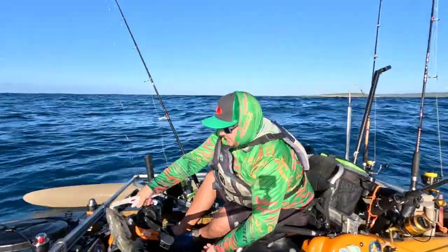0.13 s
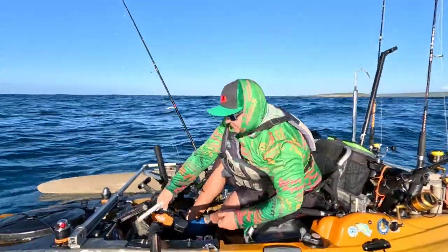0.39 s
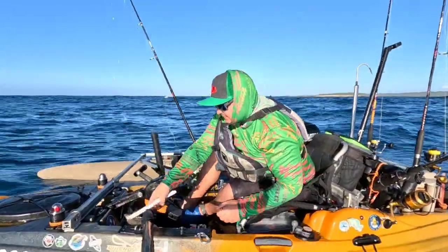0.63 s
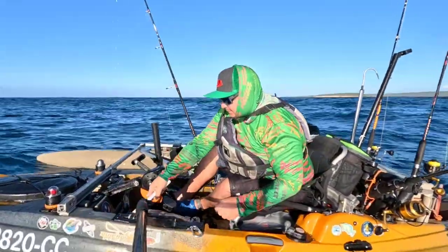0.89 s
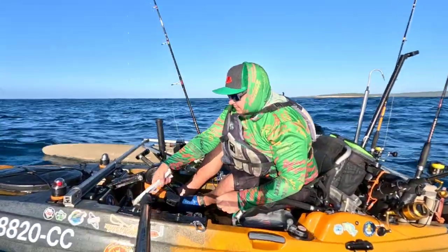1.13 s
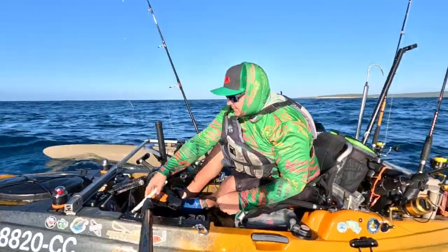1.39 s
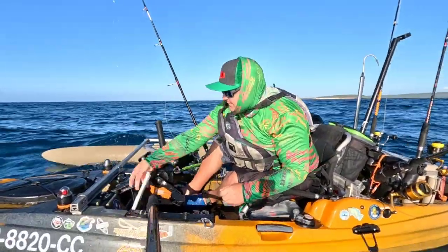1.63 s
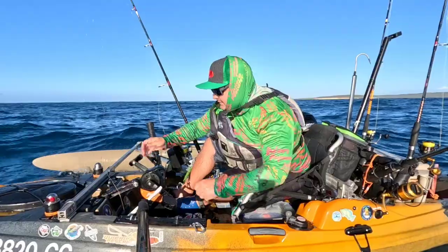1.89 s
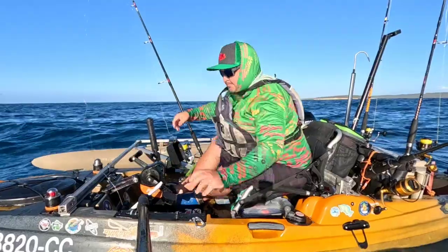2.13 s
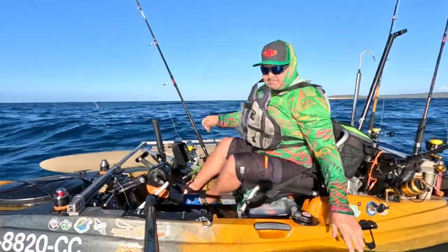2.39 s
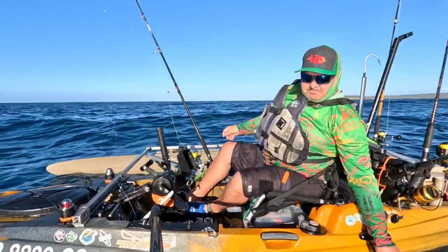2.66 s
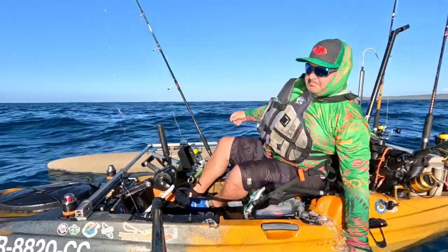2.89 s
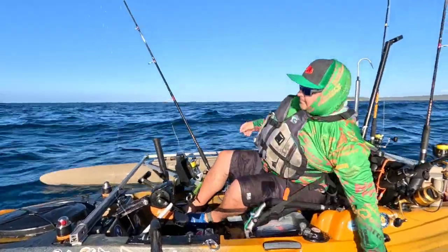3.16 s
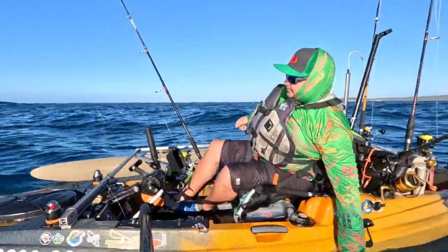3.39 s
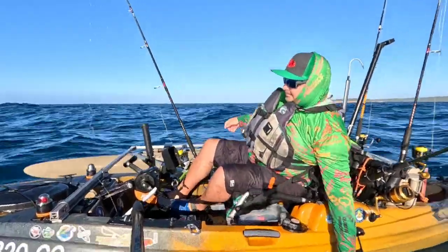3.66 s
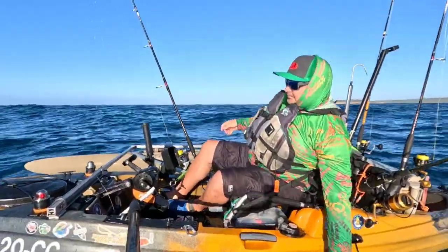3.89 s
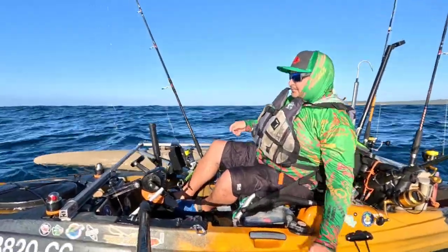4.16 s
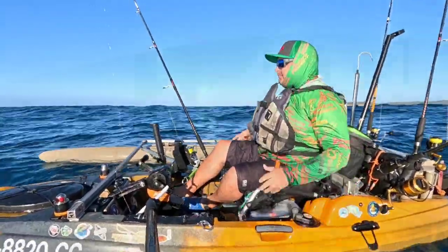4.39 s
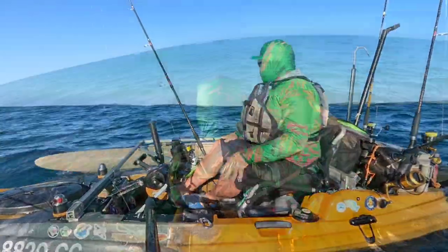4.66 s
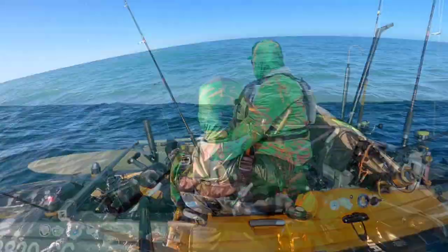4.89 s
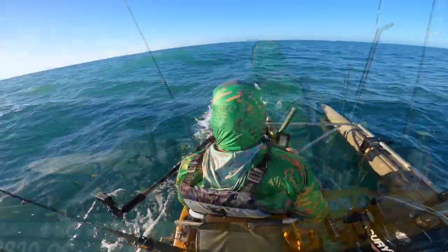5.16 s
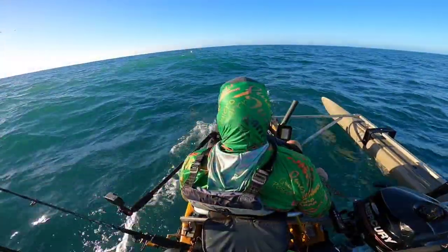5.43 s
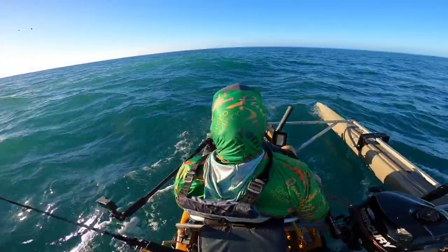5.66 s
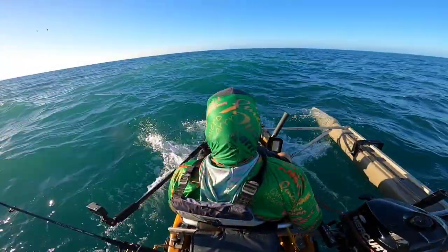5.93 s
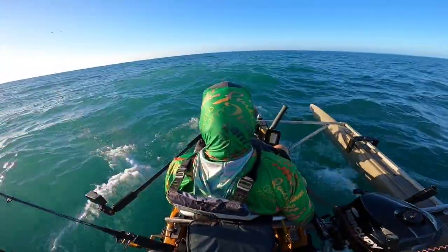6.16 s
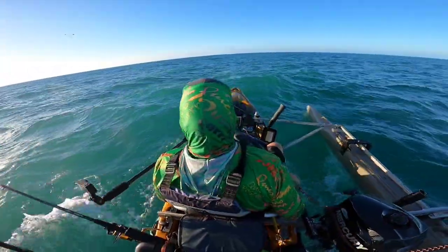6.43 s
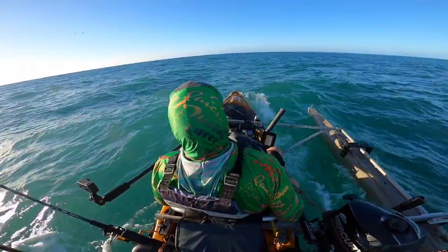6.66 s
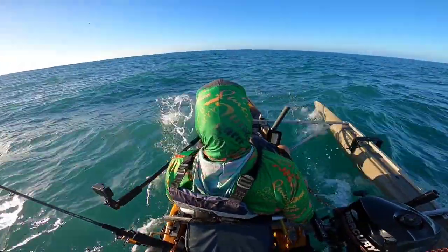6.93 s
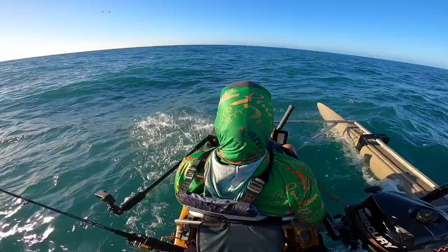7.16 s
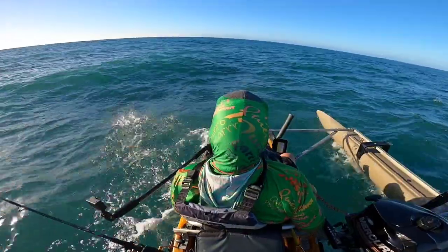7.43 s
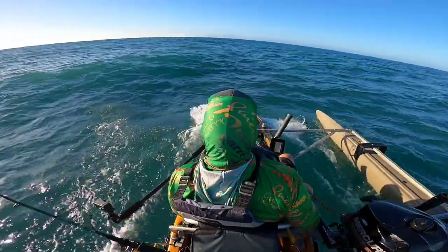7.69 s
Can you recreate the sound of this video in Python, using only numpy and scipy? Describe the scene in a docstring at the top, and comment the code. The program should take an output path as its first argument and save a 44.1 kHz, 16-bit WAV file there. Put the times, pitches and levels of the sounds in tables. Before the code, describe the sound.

Close onboard sound from a fishing kayak: uneven idle puffs and low water rumble behind hard hollow knocks, bright metallic clinks and wet rustling. Later come hand splashes, pitched drips and short rough rising blips. The sound cuts out for about a fifth of a second, then quickly returns as a fuller engine drone with fast cyclic rattle, continuous rushing water and occasional splash bursts and low blips. Open sea, no echo.

```python
"""A small boat's one-cylinder four-stroke outboard idles in soft puffs while gear knocks on the plastic hull,
tackle clinks, a hand splashes in the water and short rough tones blip; after a short silence the boat is
under way, its engine droning and its cowl rattling once a cycle as spray and wind rush along the hull.
Engine tones are sines locked to the engine cycle, water is filtered noise with damped-sine droplets,
and struck objects are decaying modes."""
import sys
import numpy as np
from scipy import signal
from scipy.fft import rfft, irfft, next_fast_len
from scipy.io import wavfile
from scipy.ndimage import uniform_filter1d, map_coordinates

SR = 44100
rng = np.random.default_rng(int(sys.argv[2]) if len(sys.argv) > 2 else 0)


def convert_level_to_amplitude(level_db):
    """Map a level in decibels to its linear amplitude factor."""
    exponent = np.asarray(level_db, float) / 20
    return 10 ** exponent


def store_pcm(level_fs):
    """Save levels as 16-bit WAV."""
    pcm = np.round(np.clip(level_fs, -1, 1) * 32767).astype(np.int16)
    wavfile.write(sys.argv[1], SR, np.atleast_2d(pcm).T)


N = 344112
T = np.arange(N) / SR


def unit(x):
    """Normalization: scales a signal to rms 1."""
    return x / np.sqrt(np.mean(x ** 2) + 1e-20)


def curves(rows):
    """Linear interpolation in time: one curve for each column after the time."""
    s, *columns = np.transpose(rows)
    return [np.interp(T, s, column) for column in columns]


def wobble(rate):
    """Band-limited fluctuation: a smooth curve through random knots, rate of them a second."""
    return map_coordinates(rng.standard_normal(int(N * rate / SR) + 4), [T * rate])


def filtered(x, response):
    """Linear filtering: the spectrum of x times a complex response of frequency."""
    m = next_fast_len(len(x) + 8192)
    return irfft(rfft(x, m) * response(np.fft.rfftfreq(m, 1 / SR)), m)[:len(x)]


def coloured(x, spectrum):
    """Spectral shaping by (hz, db) points on a log frequency axis, then rms 1."""
    f, db = np.transpose(spectrum)
    return unit(filtered(x, lambda hz: convert_level_to_amplitude(np.interp(np.log(hz + 1), np.log(f + 1), db))))


def resonance(f, hz, width):
    """Damped oscillator: the causal response of one mode, 1 at its peak."""
    return 1j * f * width / (hz * hz - f * f + 1j * f * width)


def droplets(per_s, hz, turns, spread_db):
    """Bubble oscillation: a random patter of tiny bubbles, each a few cycles of a damped sine."""
    when, pitch, size = rng.random((3, int(per_s * N / SR)))
    f = np.clip(hz * 4.5 ** (2 * pitch - 1), 600, 15000)[:, None]
    t = np.arange(300) / SR
    strength = convert_level_to_amplitude(-spread_db * np.log(size + .01))[:, None]
    grains = strength * np.sin(2 * np.pi * f * t) * f * t * np.exp(-2 * f * t / turns)
    where = (when[:, None] * N).astype(int) + np.arange(300)
    return unit(np.bincount(where.ravel(), (grains * np.sqrt(f)).ravel(), N + 300)[:N])


def rush(patchy_db, fizz, per_s):
    """Turbulence: white noise with time-frequency patches of random gain, plus droplets."""
    z = signal.stft(rng.standard_normal(N), nperseg=512)[2]
    field = uniform_filter1d(uniform_filter1d(rng.standard_normal(z.shape), 6, 0), 10, 1)
    noise = signal.istft(z * convert_level_to_amplitude(patchy_db * unit(field)), nperseg=512)[1][:N]
    return unit(noise) + fizz * droplets(per_s, 2387, turns=5.1, spread_db=4.0)


def stroke(cycles, at, width, scatter_db):
    """Cyclic modulation: a gate that swells once an engine cycle, at a new strength each time."""
    turn = cycles - at + .5
    size = convert_level_to_amplitude(scatter_db * rng.standard_normal(600))[turn.astype(int)]
    return size * np.exp(-.5 * ((turn % 1 - .5) / width) ** 2)


def cowl(gate, blows, fast):
    """Modal response: valve clatter, intake noise and firing blows ring a cover that muffles the treble."""
    # modes of the engine cover: mode_hz, width_hz, idle_db, cruise_db
    cover_modes = [(522.6, 32, -15.5, -6), (647.3, 13.7, 6, 5.5), (753, 22, -7, 9.5), (1050, 124, 2.5, 9.5),
                   (1106, 61, 1.5, 11), (1149, 32, 1, -35), (1304, 31, -6, 0), (1344, 14.7, -15, 4),
                   (1432, 84, -19, 5.5), (1848, 34, -11.5, -9), (2050, 44, -5.5, -31), (2670, 24, -11.5, 3),
                   (3320, 880, -10.5, -24)]

    def response(f):
        total = 0
        for k, (hz, width, *mode_db) in enumerate(cover_modes):
            total = total + (-1) ** k * convert_level_to_amplitude(mode_db[fast]) * resonance(f, hz, width)
        return total / (1 + 1j * f / 4000) ** 3

    return unit(filtered(unit(gate * rng.standard_normal(N)) + blows, response))


def exhaust_puffs(cycles, leg_hz):
    """Pulsed pipe resonance: each firing sends a short, slightly rising, breathy puff down the leg."""
    glide = 1 + .16 * (cycles % 1 - .5) + .025 * wobble(30)
    phase = 2 * np.pi * np.cumsum(leg_hz * glide) / SR
    breath = np.cos(phase) * (1 + .25 * wobble(60)) + .25 * np.sin(phase) * wobble(60)
    return unit(breath * (0.11 + stroke(cycles, 0.6, 0.24, scatter_db=-2.0) ** 0.9))


def idling():
    """Amplitude modulation: swells that cover and bare the exhaust leg vary the engine's puffs and rattle."""
    # engine cycles completed: time_s, cycles
    idle_cycles = [(0.0, 0.75), (0.3, 4.63), (0.6, 8.75), (0.9, 12.71), (1.2, 16.66), (1.5, 20.43),
                   (1.8, 24.15), (2.1, 27.8), (2.4, 31.66), (2.7, 35.48), (3.0, 39.22), (3.3, 42.94),
                   (3.6, 46.7), (3.9, 50.72), (4.2, 54.46), (4.5, 58.06), (4.8, 61.79), (4.92, 63.3)]
    # the leg in the swell, before the faster wobbles: time_s, exhaust_pitch_hz, exhaust_db, cowl_rattle_db
    leg = [(0.0, 226.6, -46, -45), (0.16, 217.8, -52, -44), (0.22, 215.5, -32.5, -45),
           (0.31, 220, -37, -43), (0.37, 204.3, -38, -42.5), (0.6, 263.8, -33, -45), (0.81, 240, -27, -43),
           (1.06, 227, -29, -42), (1.15, 214.8, -35, -43.5), (1.85, 213.3, -45.5, -45),
           (1.94, 220.5, -28.5, -39), (2.08, 232.5, -27, -42), (2.57, 223.6, -38, -49),
           (2.8, 214.7, -53, -47), (3.12, 220.7, -39.5, -45.5), (3.27, 241.5, -30, -49),
           (3.34, 230, -45, -45), (3.43, 243.3, -31.5, -45), (3.54, 224.5, -41.5, -49),
           (3.73, 219.6, -30.5, -56), (3.9, 231.9, -43.5, -40), (4.04, 246.1, -31, -48),
           (4.2, 226.4, -49, -45.5), (4.31, 198.8, -31.5, -49), (4.4, 212, -46, -46.5),
           (4.55, 222, -45, -47), (4.94, 228.5, -36.5, -48)]
    cycles, = curves(idle_cycles)
    leg_hz, leg_db, rattle_db = curves(leg)
    puffs = exhaust_puffs(cycles, leg_hz)
    gate = 0.25 + stroke(cycles, 0.38, 0.14, scatter_db=-2.5)
    gate = gate + 0.6 * stroke(cycles, 0.898, 0.034, scatter_db=2.5)
    rattle = cowl(gate, 0, fast=False)
    gurgle_db = 2.5 * wobble(11)  # puff-to-puff unevenness of the drowned exhaust
    return convert_level_to_amplitude(leg_db + gurgle_db) * puffs + convert_level_to_amplitude(rattle_db + 0.72 * wobble(11.0)) * rattle


def lapping():
    """Filtered turbulence: a low rumble under the hull and a steadier lap of water above it."""
    # rumble under the hull, before its wobble: time_s, level_db
    rumble_level = [(0, -36), (0.4, -33.5), (0.75, -35), (1.4, -35), (2.0, -34), (2.6, -33), (3.0, -34.5),
                    (3.7, -34), (4.2, -35), (4.92, -32.5)]
    # background spectrum, used above 300 Hz: frequency_hz, relative_db
    lap_spectrum = [(13, -31), (22, -1), (257, -6), (366, -38.5), (420, -10), (522, -12.5), (877, -18.5),
                    (1060, -21), (1250, -24), (1740, -25), (2160, -26), (4160, -36), (9000, -55),
                    (15000, -93.5)]
    rumble = coloured(rng.standard_normal(N), [(10, -20.5), (30, -1.0), (60, -2.5), (120, -5.5), (150, -5.0),
                                               (200, 0.0), (400, -15.0), (600, -61.5)])
    lap_points = [(250, -88)] + [p for p in lap_spectrum if p[0] > 300]
    lap = coloured(rush(patchy_db=4.0, fizz=0.17, per_s=200), lap_points)
    rumble_db, = curves(rumble_level)
    return convert_level_to_amplitude(rumble_db + 2.2 * wobble(26)) * rumble + convert_level_to_amplitude(-47.5 + 1.6 * wobble(4.86)) * lap


def knocks():
    """Impact excitation: each contact is a ring, a noisy crack, a tick, a hiss and a thump of the hull."""
    # gear and water on the hull: start_s, level_db, ring_hz, thump_db (re level_db)
    contacts = [(0.037, -44, 1210, 7), (0.196, -45, 706, 9), (0.225, -39, 2100, 18),
                (0.343, -28, 607, -0.5), (0.352, -38, 497, 20), (0.363, -17.5, 990, -3),
                (.367, -22.5, 980, -9), (0.374, -36, 700, 15), (0.412, -31, 897, 8),
                (0.459, -16.5, 980, -6), (0.518, -29, 857, -7), (0.558, -37, 988, -7),
                (0.866, -32, 1212, 9.5), (1.333, -21.5, 1250, -4), (1.533, -21.5, 880, -17),
                (1.568, -25, 750, -9.5), (1.947, -24.5, 1056, 3), (1.958, -18, 1140, -6.5),
                (2.285, -31.5, 689.8, 2.5), (2.426, -32.5, 800, -11), (2.531, -31, 660, 9.5),
                (3.165, -22, 1360, -19), (3.173, -22, 1100, -14), (3.191, -24, 820, -16),
                (3.242, -32, 656, -20), (3.281, -24.5, 1000, -22), (3.288, -21, 820, -13),
                (3.2958, -24, 855, -15), (3.452, -35, 1190, -13), (3.401, -37.5, 506, 9.5),
                (3.482, -26, 653, 0.5), (3.556, -35, 910, -5), (3.608, -32.5, 606, 9),
                (3.737, -32, 1703, -8), (3.745, -25.5, 1130, 4.5), (3.846, -27.5, 710, -3),
                (3.854, -24.5, 840, -20), (3.865, -25, 794, -5), (3.885, -27, 790, -18),
                (4.009, -31.5, 1208, -6), (4.102, -28, 1590, -5), (4.696, -32, 1050, -8),
                (4.829, -28.5, 659, 1)]
    hull_hz, hull_t60, hull_share = 166, 0.15, 0.9  # lowest hull mode, its decay in s, its part of the thump
    out, t = np.zeros(N + SR), np.arange(SR // 5) / SR

    def dying(t60):
        return convert_level_to_amplitude(-60 * t / t60) * (1 - np.exp(-t / .0006))

    for s, db, hz, thump_db in contacts:
        a, b, c = rng.standard_normal((3, len(t)))
        t60 = 0.031 * (1000 / hz) ** 0.19  # shorter for higher rings
        ring = 1.09 * np.sin(2 * np.pi * hz * t) * dying(0.87 * t60)
        crack = unit(filtered(a, lambda f: resonance(f, hz, 1.3 * hz) * resonance(f, hz, 4 * hz)))
        crack = .5 * crack * dying(1.4 * t60)
        hiss = convert_level_to_amplitude(-29.5) * unit(filtered(b, lambda f: resonance(f, 4500, 5000) ** 3)) * dying(t60)
        thud = unit(filtered(c, lambda f: resonance(f, 261, 202) ** 2)) * dying(0.1)
        hull = hull_share * np.sin(2 * np.pi * hull_hz * t) * dying(hull_t60)
        tick = 0.3 * b * dying(.006)
        out[round(s * SR):][:len(t)] += convert_level_to_amplitude(db) * (ring + crack + hiss + convert_level_to_amplitude(thump_db) * (thud + hull) + tick)
    return filtered(out[:N], lambda f: 1 / (1 + 1j * f / 6000) ** 2)  # the knocks' treble rolls off above 6 kHz


def stirring():
    """Splash noise: wet rustle in uneven spurts whose brightness tips the balance of lows and highs."""
    # rustle spectrum: frequency_hz, relative_db
    rustle = [(210, -34.5), (350, 3), (783, -7.5), (1260, -6.5), (1380, -10), (3350, -14.5), (7720, -27),
              (12800, -45), (15200, -50)]
    # spurts, a quick swell and a slower fade: peak_s, level_db, fade_s (for 20 dB), brightness_db
    spurts = [(0.041, -40, 0.032, 11.5), (0.232, -48, 0.093, -5), (0.35, -38.5, 0.14, 8.5),
              (0.37, -56, 0.043, -9.5), (0.413, -31.5, 0.039, 0.5), (0.439, -44, 0.046, 1),
              (0.467, -31, 0.1, 2.5), (.483, -38, 0.084, -0.5), (0.56, -38, 0.099, 2),
              (0.63, -37.5, 0.037, 1), (0.809, -41.5, 0.025, -2), (0.897, -37, 0.068, 4.5),
              (1.0, -48, 0.088, 2), (1.065, -56, 0.065, 12), (1.335, -37, 0.046, 1), (1.56, -44, 0.2, 2),
              (1.77, -38.5, 0.097, 0.5), (1.829, -34.5, .04, 10), (1.865, -41.5, 0.089, -2.5),
              (1.971, -37.5, 0.12, -1), (2.079, -42, 0.23, -0.5), (2.4, -48.5, 0.85, 1.5),
              (2.951, -38, 0.062, 1.5), (3.0, -38.5, 0.15, 4.5), (3.12, -40.5, 0.25, 6.5),
              (3.173, -25, 0.051, 0.5), (3.2, -32.5, 0.11, 2.5), (3.243, -30, 0.15, 3),
              (3.29, -39.5, 0.16, 3.5), (3.42, -40, 0.15, 1.5), (3.552, -38.5, 0.13, 0.5),
              (3.578, -34, 0.089, -0.5), (3.604, -36, 0.044, -1), (3.67, -41.5, .12, -1.5),
              (3.743, -35, 0.11, -1), (3.852, -36, 0.096, -1.5), (3.886, -32.5, 0.13, 3.5),
              (4.019, -41, 0.14, 3.5), (4.106, -33.5, 0.056, 0), (4.181, -41.5, 0.23, 1.5),
              (4.33, -45, 0.13, 3.5), (4.828, -42, 0.57, 3.5), (5.83, -23, 0.051, 1.5),
              (6.342, -23.5, 0.093, -0.5), (7.18, -26, 0.12, 4.5), (7.48, -31, .04, 7.5)]
    swell_over_fade = .4
    trickle_db = -60  # steady trickle between spurts
    wet = coloured(rush(patchy_db=1.2, fizz=0.8, per_s=2200) * convert_level_to_amplitude(2 * wobble(90)), rustle)
    spatter = coloured(droplets(500, 3000, turns=0.68, spread_db=4.5),
                       [(500, -23.0), (1500, -4.5), (5000, -9.5), (9000, -39.0), (12000, -33), (15000, -56)])
    wet = wet + convert_level_to_amplitude(-10) * spatter
    low = filtered(wet, lambda f: 1 / (1 + (f / 2500) ** 4))
    high = filtered(wet, lambda f: 1 / (1 + (6000 / (f + 1)) ** 4))
    middle = wet - low - high
    power, tipped = np.full(N, convert_level_to_amplitude(2 * trickle_db)), np.zeros(N)
    for s, db, fade, bright_db in spurts:
        near = slice(max(round((s - .5) * SR), 0), round((s + 1) * SR))
        late = (T[near] - s) / max(fade, .01)
        spurt = convert_level_to_amplitude(2 * db - 40 * np.where(late > 0, late, -late / swell_over_fade))  # power
        power[near] += spurt
        tipped[near] += spurt * np.clip(bright_db, -8, 14)
    tilt_db = tipped / power  # power-weighted mean brightness
    return np.sqrt(power) * (convert_level_to_amplitude(-2 * tilt_db) * low + middle + convert_level_to_amplitude(tilt_db) * high)


def drips():
    """Bubble entrainment: each drip is a rising damped plip with a breath of noise at its own pitch."""
    # pitched drips, spatter and small ticks: start_s, level_db, pitch_hz (at the start)
    plips = [(0.2283, -23.5, 2150), (0.4575, -24.5, 4530), (.625, -53, 7520), (0.7116, -46, 3680),
             (0.997, -37, 3100), (1.5327, -35, 2010), (1.6066, -25.5, 2030), (1.8253, -29, 3740),
             (1.9587, -21, 2540), (1.9595, -21, 3500), (2.4054, -40.5, 3720), (2.937, -48, 7880),
             (2.959, -38, 6830), (3.028, -42.5, 6540), (3.085, -23, 1750), (3.0982, -26, 2177),
             (3.1198, -29.5, 3500), (3.121, -31, 2300), (3.2415, -27.5, 2000), (3.2425, -29, 3400),
             (3.3328, -35, 2814), (3.375, -33.5, 2700), (3.429, -35.5, 2336), (3.4394, -48.5, 7710),
             (3.5063, -45, 2087), (3.56, -40, 5450), (3.6447, -44, 4900), (3.696, -43, 3560),
             (3.747, -33, 2000), (3.885, -25.5, 2340), (4.006, -40, 5880), (4.1025, -20, 1730),
             (4.103, -25, 2507), (4.115, -30.5, 3200), (4.1624, -35, 1987), (4.1904, -41, 7420),
             (4.2537, -44.5, 3900), (4.3215, -32, 3465), (4.3338, -31.5, 2500), (4.36, -39, 2660),
             (4.809, -34.5, 4500), (4.828, -36, 5500)]
    t60, half_rise_hz = 0.024, 230  # decay in s; half the pitch rise over that time
    out, t = np.zeros(N + SR), np.arange(SR // 16) / SR
    for s, db, hz in plips:
        plip = np.sin(2 * np.pi * t * (hz + half_rise_hz * t / t60))
        noise = rng.standard_normal(len(t))
        spit = 0.82 * unit(filtered(noise, lambda f: resonance(f, hz, 0.34 * hz) ** 2))
        envelope = convert_level_to_amplitude(db - 60 * t / t60) * (1 - np.exp(-t / 0.00042))
        out[round(s * SR):][:len(t)] += envelope * (.6 * plip + spit)
    return out[:N]


def clinks():
    """Modal synthesis: each clink rings the tackle's modes anew, unevenly, roughened by scraping."""
    # modes of small metal tackle: mode_hz, mode_db, t60_s
    tackle = [(3100, -5, 0.065), (3300, -6.5, .06), (3900, -11, .07), (4550, -2, .065), (5090, -4.5, 0.1),
              (5470, -6, .05), (6150, -12, .04), (7640, -9, .065), (8460, -16, .045), (9100, -17.5, .04),
              (10700, -18.5, 0.032), (11800, -18, .03), (13100, -26.5, .03)]
    # clinks: start_s, level_db, tilt_db_per_octave
    strikes = [(.413, -45, -2.5), (0.4593, -36.5, -5), (.47, -52, 4), (.872, -58, -2), (.892, -38.5, 0),
               (.911, -44, 9), (.9403, -50.5, -5), (.95, -55, -10), (.9742, -48.5, -2), (.993, -45, -10.5),
               (1.003, -42.5, -3), (1.025, -55.5, 3), (1.1264, -62, -2), (1.1817, -63.5, -4),
               (1.4586, -54, 6), (1.73, -57, 10), (1.7619, -40, 2), (1.826, -35.5, 4.5), (1.863, -46, 8),
               (1.9435, -50, 0.5), (1.959, -41, 1.5), (1.972, -35.5, -6), (2.0149, -56, -4.5)]
    out, t = np.zeros(N), np.arange(SR // 8) / SR
    hz, mode_db, t60 = np.transpose(tackle)[:, :, None]
    for s, db, tilt_db in strikes:
        luck, detune = rng.standard_normal((2, len(tackle), 1))
        level = convert_level_to_amplitude(mode_db + 3.5 * luck + tilt_db * np.log2(hz / 5000) - 60 * t / t60)
        grit = rng.standard_normal((len(tackle), len(t)))
        scrape = .6 + 3.5 * uniform_filter1d(grit, 40, 1)
        scrape = scrape + 1.3 * uniform_filter1d(grit, 7, 1) * convert_level_to_amplitude(-60 * t / .05)
        ringing = (level * scrape * np.sin(2 * np.pi * hz * (1 + 0.015 * detune) * t)).sum(0)
        out[round(s * SR):][:len(t)] += convert_level_to_amplitude(db) * ringing * (1 - np.exp(-t / 0.0014))
    return out


def whiffs():
    """Friction noise: crackly swells of very high hiss, like line or wet cloth sliding."""
    # whiffs with a Gaussian swell: peak_s, level_db, half_length_s
    slides = [(1.005, -68, .02), (1.07, -69, 0.014), (1.326, -69, 0.011), (1.46, -70.5, 0.011),
              (1.56, -75, 0.031), (1.82, -59, 0.012)]
    swell = sum(convert_level_to_amplitude(db) * np.exp(-.5 * ((T - s) / half) ** 2) for s, db, half in slides)
    hiss = coloured(rng.standard_normal(N), [(6000, -30), (10500, -3.5), (12500, 1.5), (14000, -12), (15300, -28)])
    return swell * unit(convert_level_to_amplitude(4 * wobble(150)) * hiss)


def short_tones():
    """Frequency modulation: short rough tones, mostly rising, with a wavering phase and level."""
    # tones, before the roughness: start_s, level_db, start_hz, length_s, end_over_start_pitch
    blips = [(2.433, -25, 292, 0.008, 1.3), (2.642, -33.5, 297, 0.06, 1.74), (2.717, -33, 306, 0.037, 1.7),
             (3.535, -38, 1960, 0.031, 0.53), (3.576, -31, 407, 0.033, 1.8), (3.663, -35, 665, 0.024, 1.3),
             (3.67, -29.5, 265, 0.065, 1.37), (3.695, -35, 1030, .012, 1.1), (3.765, -32, 1073, .012, 1.2),
             (3.841, -28, 449, 0.01, 1.44), (3.859, -28.5, 774, 0.032, 1.1), (3.866, -30, 1265, .016, 1.5),
             (6.291, -26, 413, 0.04, 1.47), (6.327, -27, 363, 0.051, 1.9), (6.756, -24, 296, 0.045, 1.7),
             (7.143, -25, 387, 0.033, 1.44), (7.328, -24.5, 381, 0.048, 1.5),
             (7.687, -21.5, 312, 0.027, 1.4)]
    out, rough_db, waver = np.zeros(N), 4 * wobble(200), .55 * wobble(180)
    for s, db, start_hz, length, rise in blips:
        u = np.linspace(0, 1, round(length * SR))
        span = slice(round(s * SR), round(s * SR) + len(u))
        phase = 2 * np.pi * np.cumsum(start_hz * (1 + (rise - 1) * u ** 1.91)) / SR
        tone = np.sin(np.pi * u ** 0.88) * np.sin(phase + waver[span])
        out[span] += convert_level_to_amplitude(db + rough_db[span]) * tone
    return out


def cruise_cycles():
    """Phase accumulation: a steady pace plus the hunting of the engine as the boat climbs and drops."""
    # time_s, cycles_ahead of the steady pace
    hunt = [(5.3, -.07), (5.6, -.015), (5.9, .03), (6.05, .035), (6.2, .01), (6.4, -.01), (6.65, .015),
            (6.95, -.02), (7.25, -.065), (7.55, -.08), (7.8, -.1)]
    steady = 1.46 + 28.86 * np.maximum(T - 5.1, 0)  # 28.86 cycles a second
    return steady + curves(hunt)[0] + 0.0025 * wobble(8)


def order_line(cycles, k, lag, slack):
    """Harmonic order: an unsteady line at k times the cycle rate; lag and slack in turns of the line."""
    # the orders meet in one sharp suction dip a cycle, and drift a little around it
    return -np.cos(2 * np.pi * (k * (cycles + 0.033) - lag + slack * wobble(4.6))) * np.sqrt(2)


def running_exhaust(cycles, leg_hz):
    """Source and filter: engine orders under the wandering resonance of the half-drowned exhaust leg."""
    # exhaust orders before the resonance: cycle_rate_multiple, relative_db
    orders = [(1, -15), (3, -9), (4, -2), (5, -3.5), (6, -6.5), (7, -5), (8, -5), (9, -2), (10, -2.5),
              (11, -18.5), (12, -18.5), (13, -15)]
    rate_hz = np.gradient(cycles) * SR
    drift = [(0, .04), (.15, .075)]  # (lag, slack) of even and odd orders; the odd ones come late
    total = 0
    for k, db in orders:
        strength = convert_level_to_amplitude(db + 1.9 * wobble(4) + 1.2 * wobble(16))
        leg_gain = 1 + 4 / (1 + ((k * rate_hz - leg_hz) / 20) ** 2)
        total = total + strength * leg_gain * order_line(cycles, k, *drift[int(k) % 2])
    return unit(total)


def running_rattle(cycles, clatter):
    """Periodic impacts: firings and valve gear that clatters alike each cycle shake the cowl."""
    firings = unit(np.diff(np.floor(cycles + .05), prepend=1) * convert_level_to_amplitude(1.3 * rng.standard_normal(N)))
    gear = unit(clatter * rng.standard_normal(1500)[(cycles % 1 * 1500).astype(int)])
    return cowl(clatter, -3.3 * firings + 1.7 * gear, fast=True)


def block_clatter(cycles, beat):
    """Cyclostationary noise: the block's clatter repeats each cycle, and its pattern slowly changes."""
    # clatter spectrum: frequency_hz, relative_db
    block_spectrum = [(350, -40), (550, -3), (700, -1), (870, -5), (1070, 2), (1220, -5), (1400, -3),
                      (2000, -7), (2550, -9), (2680, -2), (2800, -10), (3300, -9), (5000, -15), (8000, -26),
                      (12000, -60)]
    patterns = rng.standard_normal((3, 1500))[:, (cycles % 1 * 1500).astype(int)]
    pattern = patterns[0] + .7 * wobble(3) * patterns[1] + .7 * wobble(3) * patterns[2]
    return coloured(beat * pattern, block_spectrum)


def hull_rush(beat, wash_db):
    """Modulated turbulence: wash and spray along the hull, with a faint hiss in the top treble."""
    # low end of the wash, and the rest of it: frequency_hz, relative_db
    buffet = [(13, -33), (22, -6.5), (53, -7), (103, -4), (199, -3.5), (300, -8)]
    wash_spectrum = [(421, -11), (1070, -20.5), (1200, -21), (2710, -27.5), (5000, -36), (6500, -46),
                     (11000, -120)]
    # spray spectrum: frequency_hz, relative_db
    spray_spectrum = [(1760, 1), (3000, 1.5), (3830, -0.5), (4160, -5.5), (6650, -17.5), (8490, -12),
                      (11400, -25), (13800, -32), (15200, -53)]
    # treble, before the spray's wobble: time_s, spray_db (re wash_db), top_hiss_db
    bright = [(5.2, -17, -110), (5.4, -9, -66), (5.9, -7.5, -59.5), (7.3, -8, -59), (7.8, -7, -58)]
    spray_db, top_hiss_db = curves(bright)
    wash = coloured(rush(patchy_db=0.8, fizz=0.24, per_s=900) * beat, buffet + wash_spectrum)
    spray = coloured(rush(patchy_db=1.2, fizz=.4, per_s=2500) * beat, spray_spectrum)
    top_hiss = coloured(rush(patchy_db=1.5, fizz=.2, per_s=600),
                        [(7000, -48.5), (10500, 6.5), (13000, -9.5), (15300, -11.5)])
    return (convert_level_to_amplitude(wash_db + 0.35 * wobble(6.6)) * wash + convert_level_to_amplitude(wash_db + spray_db + 0.76 * wobble(4.9)) * spray
            + convert_level_to_amplitude(top_hiss_db) * top_hiss)


def under_way():
    """Superposition: shaft thrum, exhaust, cowl, block and rushing water share one engine cycle."""
    # riding the swell, wash before its wobble: time_s, shaft_thrum_db, exhaust_leg_hz, exhaust_db, wash_db
    run = [(5.2, -34, 205, -24.5, -26), (5.34, -22.5, 202, -25.5, -26), (5.56, -18.5, 222, -26, -23.5),
           (5.79, -26, 190, -23.5, -25.5), (5.94, -19, 187, -25, -26), (6.14, -20.5, 238, -25, -26.5),
           (6.28, -25, 230, -24, -27.5), (6.34, -22, 239, -23.5, -28), (6.4, -21, 216, -24.5, -28),
           (6.47, -37, 200, -24.5, -26.5), (6.57, -30, 217, -23.5, -29), (6.94, -23.5, 214, -26, -29.5),
           (7.36, -29, 180, -26.5, -26.5), (7.48, -25, 175, -27, -28), (7.58, -26, 200, -29.5, -28.5),
           (7.73, -19.5, 217, -27.5, -28), (7.8, -19, 205, -27.5, -28.5)]
    # cowl rattle: time_s, level_db
    rattle_level = [(5.2, -57), (5.4, -34), (5.85, -36.5), (6.2, -43), (6.7, -46.5), (7.1, -40.5),
                    (7.4, -41.5), (7.8, -50)]
    thrum_db, leg_hz, exhaust_db, wash_db = curves(run)
    rattle_db, = curves(rattle_level)
    cycles = cruise_cycles()
    clatter = .15 + stroke(cycles, 0, .07, scatter_db=1.5) + .45 * stroke(cycles, .3, .06, scatter_db=1.5)
    beat = 1 + .5 * clatter  # the engine's jolts shake the spray loose
    thrum = order_line(cycles, 2, 0.086, 0.02)
    engine = convert_level_to_amplitude(thrum_db) * thrum + convert_level_to_amplitude(exhaust_db) * running_exhaust(cycles, leg_hz)
    rattle = convert_level_to_amplitude(rattle_db) * running_rattle(cycles, clatter)
    block = convert_level_to_amplitude(wash_db - 7 + wobble(2.916)) * block_clatter(cycles, beat)
    return engine + rattle + block + hull_rush(beat, wash_db)


def scene():
    """Superposition: idle, silence, then the run fades in; water splashes and short tones sound in both."""
    # fade-in of the run: time_s, gain_db
    fade_in = [(5.145, -70), (5.165, -38), (5.19, -14), (5.225, 0)]
    idle_end_s = 4.937
    splashes = stirring() + short_tones()
    fade_db, = curves(fade_in)
    before = idling() + lapping() + knocks() + drips() + clinks() + whiffs() + splashes
    after = (under_way() + splashes) * convert_level_to_amplitude(fade_db)
    return (before * (T < idle_end_s) + after * (T > fade_in[0][0]))[None]


def top_cut(x):
    """Nothing passes above the cut-off."""
    return signal.sosfilt(signal.butter(12, 15380, fs=SR, output="sos"), x)


def record(dry):
    """Band limiting: nothing at or above 15.4 kHz is kept in the finished mix."""
    mix = filtered(dry[0], lambda f: f < 15400)[None]
    return top_cut(mix)


dry = scene()
out = record(dry)
store_pcm(out)
```